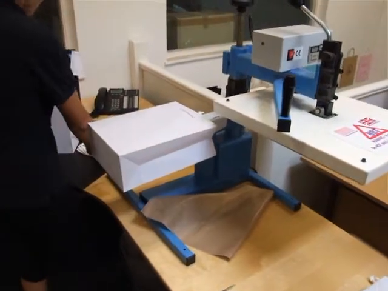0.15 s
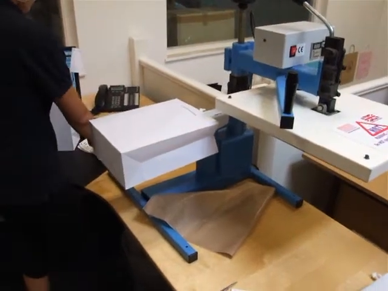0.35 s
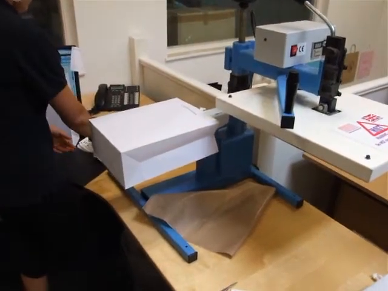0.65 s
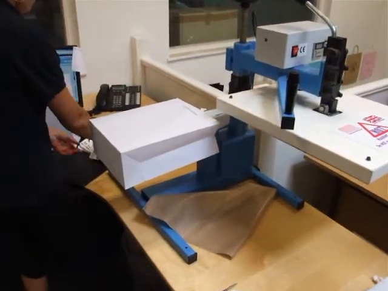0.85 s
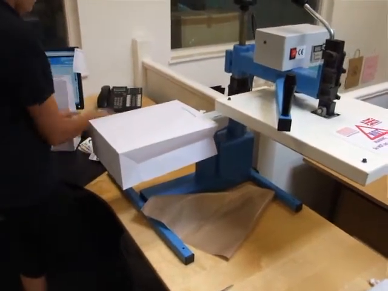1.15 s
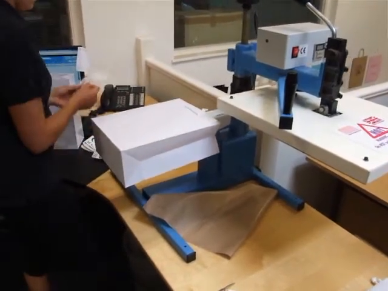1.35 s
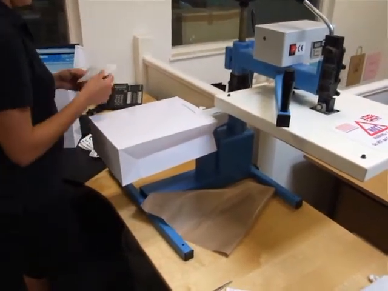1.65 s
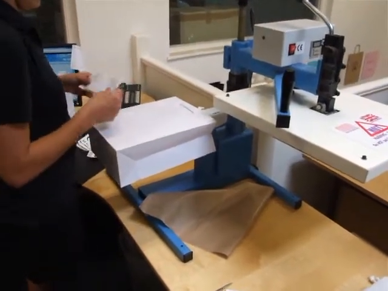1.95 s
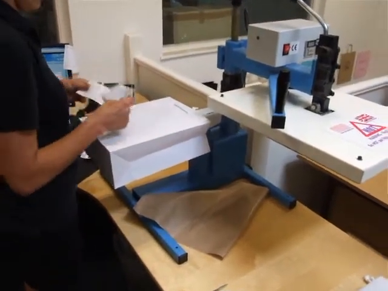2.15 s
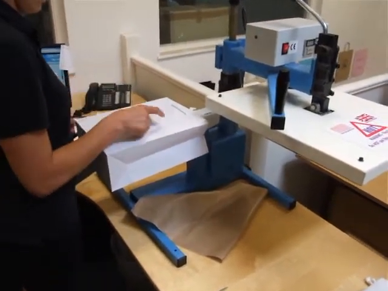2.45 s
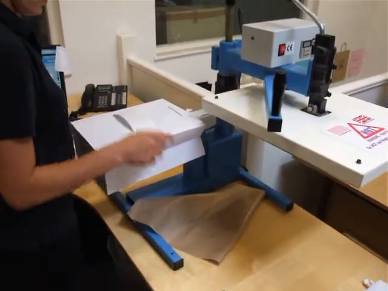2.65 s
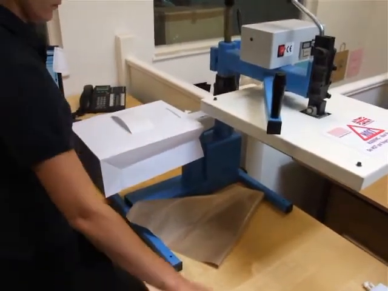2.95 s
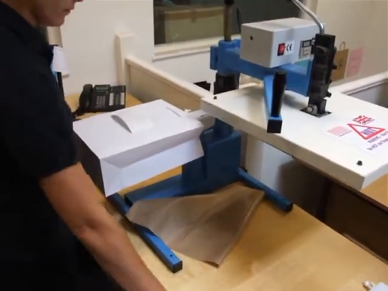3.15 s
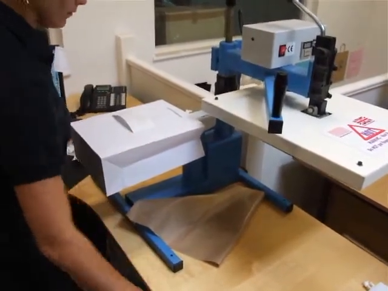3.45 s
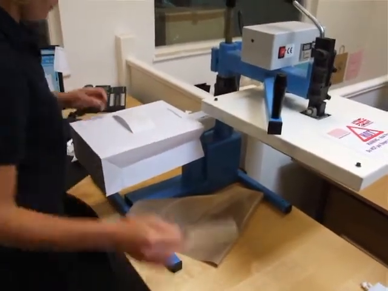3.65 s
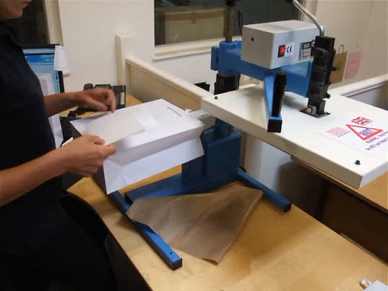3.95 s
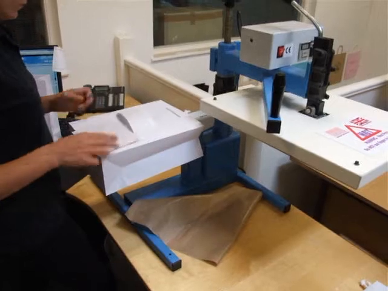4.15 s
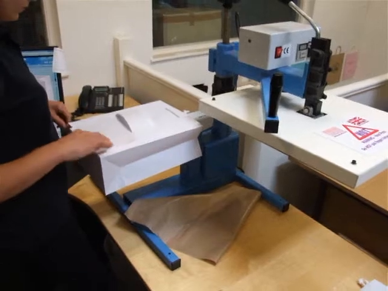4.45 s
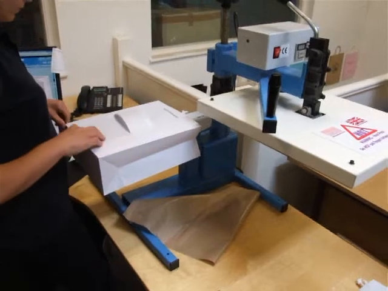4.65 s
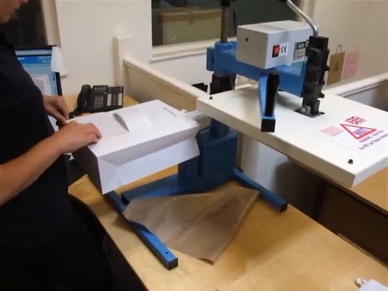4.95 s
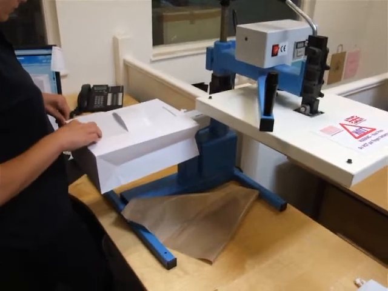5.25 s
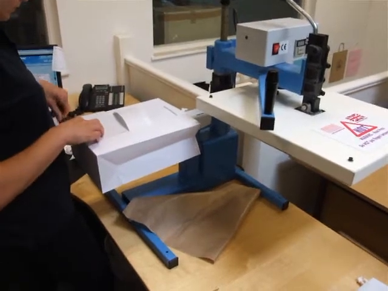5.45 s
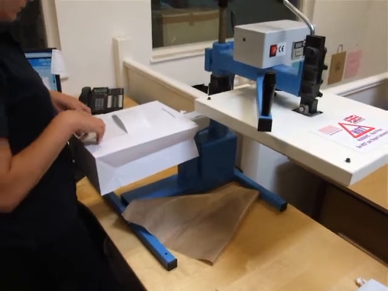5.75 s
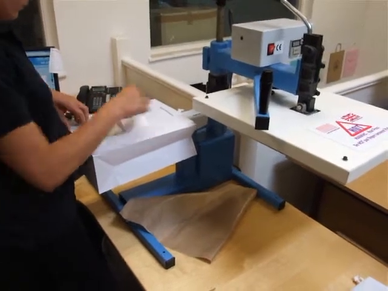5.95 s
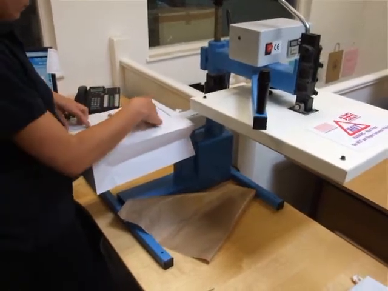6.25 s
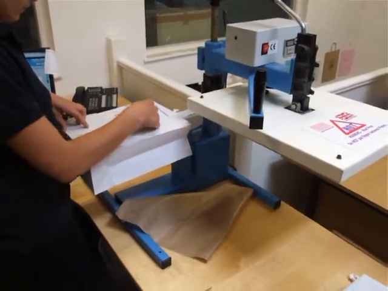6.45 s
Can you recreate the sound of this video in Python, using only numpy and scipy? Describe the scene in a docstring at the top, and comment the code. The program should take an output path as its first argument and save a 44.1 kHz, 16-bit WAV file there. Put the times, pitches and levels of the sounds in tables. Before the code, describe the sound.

Close crisp handling of stiff paper with dry ticks and soft bumps, a short sticky tape pull and sharp rip, over steady ventilation.

```python
"""A small workroom, one microphone: hands peel and smooth a sheet and lay it on a paper bag on a heat press.
From the start fibre slips make rustle, creases snap through, soft bumps boom and dry ticks creak close by;
along with some of the strokes a gliding edge hisses, and catches once. Next, glue slips rasp as tape is pulled
off its roll; torn on the blade, it rings the dispenser, which jolts on the desk. A little paper handling follows.
Throughout, ventilation gives coloured air noise and wavering hum; echoes and a tail place all else in the room."""
import sys
import numpy as np
from scipy import signal
from scipy.fft import rfft, irfft
from scipy.io import wavfile
from scipy.ndimage import uniform_filter1d

SR = 44100
rng = np.random.default_rng(int(sys.argv[2]) if len(sys.argv) > 2 else 0)


def put_to_file(sound):
    """Save the sound as 16-bit audio at rate SR, in the file named by the first command-line argument."""
    columns = np.atleast_2d(sound).T  # one column per channel
    safe = np.clip(columns, -1, 1)
    whole_steps = np.round(safe * 32767)
    wavfile.write(sys.argv[1], SR, whole_steps.astype(np.int16))


N = 291501   # length in samples

# Levels in the tables are relative: the functions trim, vary and place them in the room.
# Strokes of the hands over the paper: start t/s, length/s, surface crackle level/dB,
# sheet flexing level/dB, palm brushing level/dB
STROKES = [(0, 0.015, -52, -48, -44.5), (0.564, .07, -46.5, -57, -68), (0.64, 0.049, -39, -42, -52),
           (.70, 0.091, -37, -40, -47), (0.843, 0.15, -38.5, -43, -52), (1.033, 0.021, -47.5, -43.5, -54),
           (1.24, .06, -46.5, -48, -53), (1.335, 0.15, -50.5, -56, -60), (1.585, 0.042, -45.5, -57, -43),
           (1.618, 0.3, -45, -53.5, -59), (1.952, 0.19, -39, -52, -56), (2.215, .04, -39.5, -47, -46),
           (2.257, 0.019, -43.5, -36, -47), (2.287, 0.14, -50, -48.5, -59), (2.42, 0.12, -49.5, -56, -56),
           (2.554, 0.032, -44.5, -37.5, -43), (2.655, 0.024, -42.5, -52, -62),
           (2.76, 0.082, -59, -49.5, -58), (3.154, .17, -41, -54.5, -74),
           (3.342, 0.22, -47.5, -48.5, -43.5), (3.373, 0.13, -44, -40.5, -41), (3.54, .13, -65, -57, -47.5),
           (3.825, 0.065, -43.5, -45.5, -60), (4.076, 0.063, -44.5, -55, -46),
           (4.318, 0.037, -44.5, -48, -40.5), (4.393, 0.21, -42.5, -54, -56), (4.62, 0.13, -50, -66, -70),
           (6.295, 0.28, -44.5, -51, -56)]
# Steady floor under the strokes: crackle level/dB, flexing level/dB, brushing level/dB
HELD_LEVELS = (-60.5, -64.5, -68.5)
STROKE_ATTACK_SHARE, STROKE_RELEASE_S = 0.27, 0.03   # share of the length; s
# Creases snapping through: t/s, level/dB, dying time/s, share of the sheet's body/dB
SNAPS = [(.371, -44.5, 0.026, -5), (0.6467, -24, .0022, -7), (.7012, -26.5, 0.0085, -10),
         (.996, -32, 0.0021, 2.5), (1.279, -36, 0.0054, -12), (1.2831, -12.5, 0.0047, -8.5),
         (1.9643, -34, 0.013, -13), (2.004, -32.5, 0.0043, -0.5), (2.106, -29.5, .002, -15),
         (2.215, -34, 0.0045, -11), (2.3298, -32.5, 0.0026, 0), (2.3332, -14, .0007, -9),
         (2.511, -40.5, 0.017, 5), (2.555, -28, 0.0026, 0.5), (2.772, -44.5, 0.0093, 0),
         (3.108, -44, 0.0065, -3), (3.811, -39, .005, -17), (3.8318, -34, 0.0043, -9),
         (3.892, -35.5, .005, -4), (4.078, -35.5, 0.0059, -4.5), (4.193, -38, .006, -2.5),
         (4.3213, -41, 0.0063, -2), (4.340, -38, .005, 1), (6.118, -39, 0.0045, -3),
         (6.226, -43, 0.0096, 3)]
SETTLE_DELAY_S, SETTLE_DB, SETTLE_SLOWER = .003, -12, 4.9   # s; dB; times the dying time
# A sheet gliding edge-on over a smooth surface: start t/s, length/s, hiss level/dB
GLIDES = [(1.705, .06, -38), (1.80, 0.078, -40), (2.775, 0.025, -53), (3.168, 0.16, -32.5),
          (3.39, 0.034, -37)]
GLIDE_ATTACK_SHARE, GLIDE_RELEASE_S = 0.15, 0.0089   # share of the length; s
# The gliding edge catches once: t/s, level/dB, half length/s
GLIDE_CATCH = (3.230, -18.5, .0016)
# Tugs that draw tape off the roll: start t/s, length/s, rasp level/dB, unsteadiness of the slips/0-1
TUGS = [(5.123, .074, -28.5, .5), (5.259, .05, -40, .11)]
TUG_ATTACK_SHARE, TUG_RELEASE_S = 0.27, 0.021   # share of the length; s
SLIP_START_HZ, SLIP_CLIMB_HZ_PER_S, SLIP_TOP_HZ = 898, 19000, 3310   # slip rate before unsteadiness
# Crackle of the glue: start t/s, length/s, level/dB
GLUE_CRACKLE = (5.146, 0.05, -27)
GLUE_ATTACK_SHARE, GLUE_RELEASE_S = .1, .008   # share of the length; s
# Tape cracking free and parting on the teeth: t/s, level/dB, dying time/s, share of the dispenser's body/dB
RIPS = [(5.1465, -19.5, 0.0096, -16), (5.1595, -11, 0.0031, -23.5), (5.181, -20, 0.0045, -18),
        (5.5772, -17.5, 0.012, -11.5), (5.5825, -19.5, 0.0041, 5.5), (5.5895, -20, 0.0081, 0),
        (5.5948, -10, 0.0026, -1.5), (5.5992, -15.5, 0.0015, 0), (5.607, -13, 0.0023, -12)]
# Dispenser landing and rocking on the desk: t/s, level/dB, dying time/s, thud of the desk/dB
JOLTS = [(5.580, -21, 0.031, -21), (5.604, -30, 0.033, 4.5), (5.626, -29, 0.09, -5),
         (5.658, -26.5, 0.052, -8.5), (5.729, -27, 0.027, 0.5), (5.741, -28.5, 0.03, -0.5)]
# Resonances of the dispenser's shell: f/Hz, width/Hz, level/dB
DISPENSER_MODES = [(400, 38, -5), (528, 36, 1.5), (970, 100, -4.5), (1077, 36, -3.5), (2160, 140, -8.5),
                   (3370, 360, -28)]
# Runs of dry creaking ticks: start t/s, number of ticks, gap/s, first level/dB, change per tick/dB
CREAKS = [(0.4752, 2, .016, -35.5, -7), (0.5913, 1, 0, -36, 0), (.7836, 1, 0, -35, 0),
          (.9098, 3, 0.036, -30, -2.5), (2.1415, 2, 0.017, -36.5, -4), (2.446, 3, .0333, -32, -.8),
          (4.142, 2, 0.013, -33.5, -3), (4.2414, 2, .0155, -37, 0), (4.5104, 4, .0338, -34.5, 1.2),
          (6.208, 1, 0, -34.5, 0), (6.3086, 2, .0168, -41, 4), (6.574, 1, 0, -36.5, 0)]
# Fixed resonances of the ticking body: f/Hz, width/Hz, level/dB
TICK_MODES = [(1590, 170, -4.5), (2520, 140, -1), (3690, 350, -5.5), (5900, 710, -7)]
TICK_LOW_HZ, TICK_CLIMB_HZ = 587, 50   # lowest resonance of a run's first tick, and its climb per tick
# Dull bumps on the bag and the desk: t/s, level/dB, dying time/s, pitch f/Hz
BUMPS = [(.01, -45.5, 0.042, 87.5), (.02, -47.5, 0.043, 271), (1.284, -44.5, 0.034, 360),
         (1.573, -37.5, 0.0074, 500), (1.606, -45, 0.027, 480), (2.567, -38.5, 0.011, 354),
         (4.143, -40.5, 0.0056, 390), (4.34, -43.5, 0.017, 433), (5.266, -38.5, 0.027, 466),
         (5.302, -47, 0.027, 166), (6.214, -34.5, 0.023, 317), (6.228, -33.5, 0.018, 337),
         (6.539, -48, 0.023, 133)]
# Colour of the paper surface's crackle: f/Hz, level/dB per Hz
CRACKLE_COLOUR = [(60, -61), (300, -47), (2000, -15), (4000, -2), (5200, 0), (6600, 5), (7800, 0),
                  (8800, -9), (9600, -22.5), (10300, -41)]
# Colour of the flexing sheet: f/Hz, level/dB per Hz
FLEX_COLOUR = [(60, -53.5), (200, -28), (600, -11.5), (1200, -6), (1800, 1), (2600, -1.5), (3700, -1),
               (5500, -10), (9000, -51.5)]
# Colour of the brushing palm: f/Hz, level/dB per Hz
BRUSH_COLOUR = [(60, -42), (250, -2), (450, -5), (700, 5.5), (1300, -2), (2200, 1.5), (6000, -55)]
# Colour of sharp releases in paper, tape and glue: f/Hz, level/dB per Hz
SNAP_COLOUR = [(60, -34), (250, -16.5), (1500, -39), (3000, -13.5), (4300, -7.5), (5200, -1.5), (6600, 0.5),
               (7800, -6), (8800, -13.5), (9600, -25), (10300, -51)]
# Colour of the gliding edge: f/Hz, level/dB per Hz
GLIDE_COLOUR = [(1000, -40), (3500, -20.5), (5000, -14.5), (6100, 1.5), (7200, 3.5), (8300, -3.5),
                (9200, -16), (10300, -38)]
# Colour of the tape's rasp: f/Hz, level/dB per Hz
RASP_COLOUR = [(100, -12.0), (400, -2), (1000, 12.0), (3600, -2.5), (5000, -1.0), (9000, -33)]
# Colour of the dispenser's body: f/Hz, level/dB per Hz
DISPENSER_COLOUR = [(60, -14), (170, -8), (300, -3.5), (450, -0.5), (700, 0.5), (1000, 1), (1700, 0),
                    (2400, 0), (4000, -1), (6800, -3.5), (8200, -9), (10000, -35)]
# Colour of the desk's thud: f/Hz, level/dB per Hz
DESK_COLOUR = [(25, -35), (45, -25), (62, -4), (100, 3), (150, -1.5), (220, -4.5), (400, -4.5), (1500, -66)]
# Near echoes from desk, press and wall: delay t/s, level/dB
ECHOES = [(.0021, -34), (.0056, -25), (0.0123, -26)]
# Time for the room's tail to fall 60 dB: f/Hz, T60/s
ROOM_T60 = [(60, 0.88), (300, 0.52), (1000, 0.51), (4000, 0.4), (9000, 0.34)]
# Colour of the ventilation's air noise: f/Hz, level/dB per Hz
AIR_COLOUR = [(22, -16.5), (45, -7.5), (60, -10), (78, -15), (118, -5.5), (160, -11), (215, -6.5),
              (320, -7), (550, -11.5), (1600, -14.5), (4200, -16.5), (6300, -16), (8100, -20),
              (9100, -33.5), (10200, -57)]
AIR_DB = -49   # dB rms
# Fan and mains hum: f/Hz, middle level/dB rms
HUM = [(100, -70.5), (199.5, -61.5), (241, -64.5)]
CEILING, ZERO_OFFSET, CUTOFF_HZ = .85, -.0037, 10000   # soft peak limit; resting value; top edge in Hz


def from_db(db):
    """Decibels to gain."""
    return 10 ** (np.asarray(db) / 20)


def rms_one(x):
    """Scale to rms 1."""
    return x / np.sqrt(np.mean(x ** 2) + 1e-20)


def at_hz(points, hz):
    """Read a table on a log-frequency axis."""
    f, value = np.transpose(points)
    return np.interp(np.log(np.maximum(hz, 1)), np.log(f), value)


def add(out, s, sound):
    """Mix a sound in at time s."""
    start = max(int(s * SR), 0)
    out[start:start + len(sound)] += sound[:N - start]


def colour(x, spectrum, size=4096):
    """Causal (minimum-phase) filter that keeps the power of white noise."""
    gain = from_db(at_hz(spectrum, np.arange(size // 2 + 1) * SR / size))
    cepstrum = irfft(np.log(gain))
    # doubling the causal half of the cepstrum gives minimum phase
    response = irfft(np.exp(rfft(2 * cepstrum[:size // 2], size)))
    return signal.fftconvolve(x, response / np.linalg.norm(response))[:len(x)]


def resonate(x, hz, width_hz):
    """One resonance that keeps the power of white noise."""
    r = np.exp(-np.pi * width_hz / SR)
    zeros = np.sqrt((1 - r * r) / 2) * np.array([1, 0, -1])
    poles = [1, -2 * r * np.cos(2 * np.pi * hz / SR), r * r]
    return signal.lfilter(zeros, poles, x + 1e-18)


def body(x, modes):
    """Resonances of a struck body in parallel, signs alternating."""
    return sum((-1) ** k * from_db(db) * resonate(x, hz, width)
               for k, (hz, width, db) in enumerate(modes))


def drift(rate):
    """Random wander: straight lines between normal draws of spread 1, rate draws per second."""
    knots = rng.standard_normal(N // 20)
    return np.interp(np.arange(N) * rate / SR, np.arange(len(knots)), knots)


def grains(per_s, spread_db):
    """Tiny slips of fibres: random clicks of uneven size, rms 1."""
    sizes = from_db(spread_db * np.minimum(rng.exponential(1, N), 4.5)) * rng.choice([-1, 1], N)
    return rms_one(sizes * (rng.random(N) < per_s / SR))


def burst(dying_s, lead=2.6, spread_db=1.5, size=12000):
    """One sharp slip sets off an avalanche of smaller ones, which starts near rms 1 and dies away."""
    fade = np.exp(-np.arange(size) / SR / max(dying_s, 1e-4))
    sizes = from_db(spread_db * np.minimum(rng.exponential(1, size), 4)) * rng.choice([-1, 1], size)
    slips = sizes * (rng.random(size) < .25) * fade
    slips[0] = lead
    return slips * np.linalg.norm(fade) / np.linalg.norm(slips)


def swells(rows, attack_share, release_s):
    """Gain of movements (start t/s, length/s, level/dB): each gathers speed, holds and dies away."""
    t, power = np.arange(N) / SR, 0
    for s, length_s, db in rows:
        attack = np.clip((t - s) / max(attack_share * length_s, 1e-4), 0, 1)
        release = np.exp(-np.clip((t - s - length_s) / release_s, 0, 20))
        power = power + (from_db(db) * attack * release) ** 2
    return np.sqrt(power)


def cracks(table, edge_spectrum, body_spectrum, lead=2.8):
    """Each release of tension sounds at the edge and shakes the body behind it."""
    edge, shaken = np.zeros(N), np.zeros(N)
    for s, db, dying_s, body_db in table:
        add(edge, s, from_db(db) * burst(dying_s, lead))
        add(shaken, s, from_db(db + body_db) * burst(dying_s, lead))
    return colour(edge, edge_spectrum), colour(shaken, body_spectrum)


def rustle():
    """Sliding paper crackles, flexes and is brushed; the stiff surface catches and slips, the palm does not."""
    gains = []
    for k, held_db in enumerate(HELD_LEVELS):
        rows = [(s, length_s, levels[k]) for s, length_s, *levels in STROKES]
        gains.append(np.hypot(from_db(held_db), swells(rows, STROKE_ATTACK_SHARE, STROKE_RELEASE_S)))
    crackling, flexing, brushing = gains
    catching = drift(rate=76)   # shared by the surface and the sheet
    crackle_grains = colour(grains(per_s=3300, spread_db=2.0), CRACKLE_COLOUR)
    flex_grains = colour(grains(per_s=3500, spread_db=3.5), FLEX_COLOUR)
    brush_grains = colour(grains(per_s=7000, spread_db=1.5), BRUSH_COLOUR)
    crackle = crackling * from_db(-1.5 + 2.0 * catching) * crackle_grains
    flex = flexing * from_db(-2.5 + 2.3 * catching) * flex_grains
    brush = brushing * from_db(-5.0) * brush_grains
    return crackle + flex + brush


def snaps():
    """A crease snaps through, then the sheet settles with a softer, longer crackle without a leading click."""
    settling = [(s + SETTLE_DELAY_S, db + SETTLE_DB, dying_s * SETTLE_SLOWER, body_db)
                for s, db, dying_s, body_db in SNAPS]
    snapping = sum(cracks(SNAPS, SNAP_COLOUR, FLEX_COLOUR, lead=3.7))
    return snapping + sum(cracks(settling, SNAP_COLOUR, FLEX_COLOUR, lead=0))


def glide():
    """A paper edge stutters finely as it glides: a thin, high hiss, with a brief chirp where it catches."""
    gliding = swells(GLIDES, GLIDE_ATTACK_SHARE, GLIDE_RELEASE_S)
    stutter = from_db(-1.5 + 2.6 * drift(rate=250))
    hiss = gliding * stutter * colour(grains(per_s=8000, spread_db=3.5), GLIDE_COLOUR)
    s, db, half_s = GLIDE_CATCH
    catching = from_db(db) * np.exp(-((np.arange(N) / SR - s) / half_s) ** 2)
    return hiss + colour(catching * rng.choice([-1, 1], N), GLIDE_COLOUR)


def tape_pull():
    """The glue lets go in uneven slips, whose rate climbs to a top as the tape speeds up."""
    t = np.arange(N) / SR
    starts, lengths, _, roughness = np.transpose(TUGS)
    climb_hz = SLIP_CLIMB_HZ_PER_S * np.maximum(t - starts[0], 0)
    slip_hz = np.minimum(SLIP_START_HZ + climb_hz, SLIP_TOP_HZ)
    unsteady = np.interp(t, starts + lengths / 2, roughness)
    turns = np.cumsum(slip_hz * np.exp(unsteady * drift(rate=1500))) / SR
    slips = np.diff(np.floor(turns), prepend=0)   # one click per whole turn
    rasp = colour(slips - uniform_filter1d(slips, size=200), RASP_COLOUR)
    # even out the level, then let it flutter at random
    rasp = rasp / np.sqrt(uniform_filter1d(rasp ** 2, size=400) + 1e-12)
    rasp = rasp * from_db(4.15 * drift(rate=990))
    pulling = swells([tug[:3] for tug in TUGS], TUG_ATTACK_SHARE, TUG_RELEASE_S)
    crackling = swells([GLUE_CRACKLE], GLUE_ATTACK_SHARE, GLUE_RELEASE_S)
    glue = crackling * colour(grains(per_s=4400, spread_db=6.5), SNAP_COLOUR)
    return from_db(-1.5) * pulling * rasp + glue


def ringing(shell):
    """The dispenser's hollow shell adds its own notes to every blow."""
    return from_db(3.0) * shell + from_db(-13.0) * body(shell, DISPENSER_MODES)


def tape_tear():
    """The tape cracks free, then parts tooth by tooth, and tugs at the dispenser."""
    rip, tug = cracks(RIPS, SNAP_COLOUR, DISPENSER_COLOUR)
    return rip + ringing(tug)


def dispenser_jolts():
    """The dispenser rattles as it rocks, and the desk thuds under it."""
    rattle, thud = cracks(JOLTS, DISPENSER_COLOUR, DESK_COLOUR)
    return ringing(rattle) + thud


def ticks(swell_s=0.00139, size=2000):
    """Creaks are runs of millisecond slips that ring a small hollow body, higher as the strain grows."""
    out, age = np.zeros(N), np.arange(size) / SR / swell_s
    for s, count, gap_s, db, change_db in CREAKS:
        for k in range(round(count)):
            slip = rng.choice([-1, 1], size) * age ** 2 * np.exp(-age)
            low_hz = TICK_LOW_HZ + k * TICK_CLIMB_HZ
            low = resonate(resonate(slip, low_hz, 220), low_hz, 220)
            sound = rms_one(body(slip, TICK_MODES)) + from_db(-5.5) * rms_one(low)
            add(out, s + k * gap_s - swell_s, from_db(db - 14.0 + k * change_db) * rms_one(sound))
    return out


def bumps(relative_width=0.67):
    """Soft contacts give a short dull boom: a burst through two equal broad resonances."""
    out = np.zeros(N)
    for s, db, dying_s, hz in BUMPS:
        push = burst(dying_s)
        width_hz = hz * relative_width
        boom = resonate(resonate(push, hz, width_hz), hz, width_hz)
        add(out, s, from_db(db) * np.std(push) * rms_one(boom))
    return out


def room(x, wet_db, gap_s=0.0029, size=36000):
    """Direct sound, a few near echoes and a diffuse tail whose treble dies first; each call draws its own tail."""
    t, white = np.arange(size) / SR, rfft(rng.standard_normal(size))
    centres, hz = np.geomspace(60, 9000, num=7), np.arange(size // 2 + 1) * SR / size
    tail = 0
    for centre, weights in zip(centres, np.eye(len(centres))):
        band = irfft(white * at_hz(np.c_[centres, weights], hz))
        tail = tail + band * 1000 ** (-t / at_hz(ROOM_T60, centre))
    response = from_db(wet_db) * tail / np.linalg.norm(tail) * (t > gap_s)
    for delay_s, db in ECHOES:
        response[int(delay_s * SR)] += from_db(db)
    # small sources send little deep bass into the room
    radiated = signal.sosfilt(signal.butter(2, 190, "high", fs=SR, output="sos"), x)
    return x + signal.fftconvolve(radiated, response)[:N]


def ventilation():
    """Even air noise with a faint hum, whose level and phase waver."""
    t, hum = np.arange(N) / SR, 0
    for hz, db in HUM:
        gain = from_db(db + 0.51 * drift(rate=4.3)) * np.sqrt(2)   # rms to peak
        hum = hum + gain * np.sin(2 * np.pi * hz * t + 0.96 * drift(rate=2.07))
    return from_db(AIR_DB) * colour(rng.standard_normal(N), AIR_COLOUR) + hum


def scene():
    """Everything reaches one microphone; the tape stirs the room most, the close ticks least."""
    paper = room(rustle() + glide(), wet_db=-6.5) + room(from_db(0.63) * snaps(), wet_db=-5.5)
    tape = room(tape_pull(), wet_db=-4.0) + room(tape_tear(), wet_db=-2.0)
    dispenser = room(dispenser_jolts(), wet_db=-8.0)
    contacts = room(bumps(), wet_db=-7.0) + room(ticks(), wet_db=-15.5)
    mono = paper + tape + dispenser + contacts + ventilation()
    return np.array([mono, mono])


def record(dry):
    """The highest peaks are rounded, the converter rests slightly off zero, and the top is cut."""
    rounded = CEILING * np.tanh(dry / CEILING) + ZERO_OFFSET
    return signal.sosfilt(signal.ellip(10, .1, 80, CUTOFF_HZ, fs=SR, output="sos"), rounded)


dry = scene()
out = record(dry)
put_to_file(out)
```